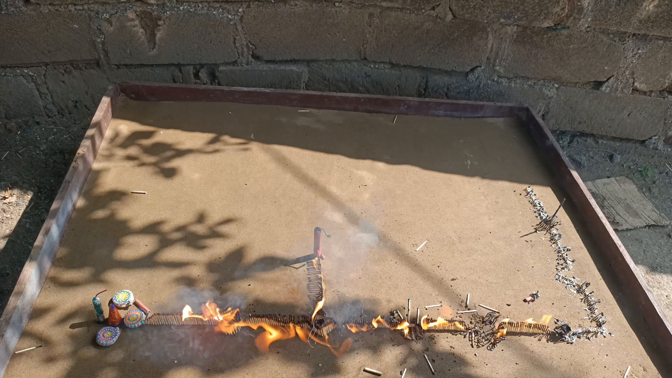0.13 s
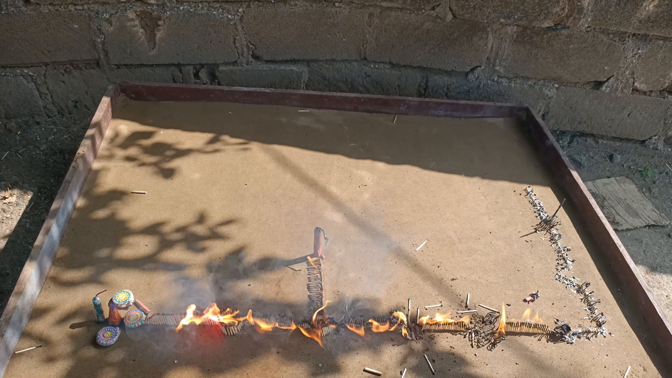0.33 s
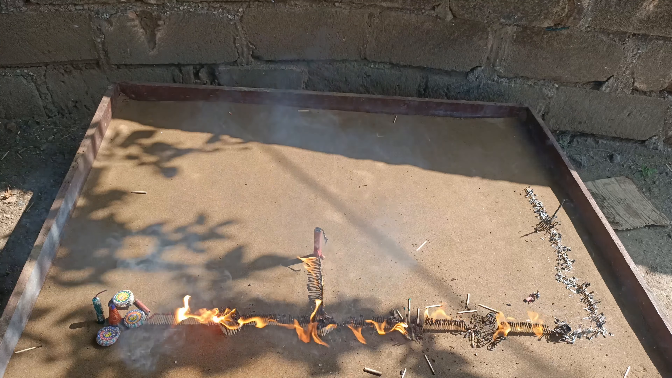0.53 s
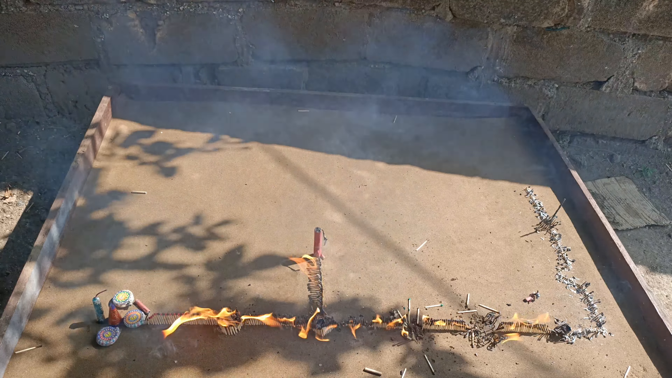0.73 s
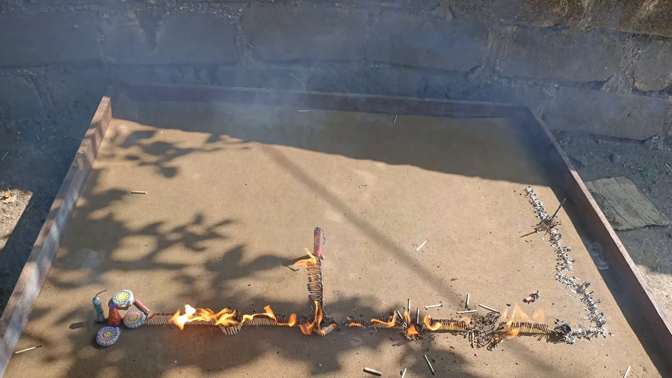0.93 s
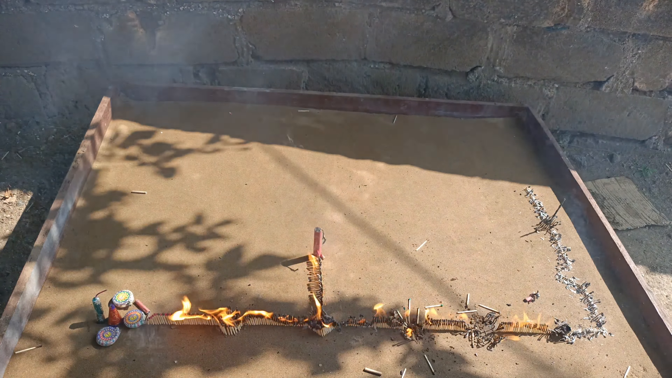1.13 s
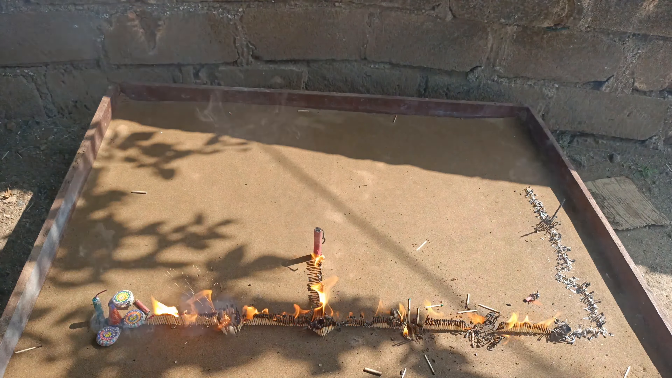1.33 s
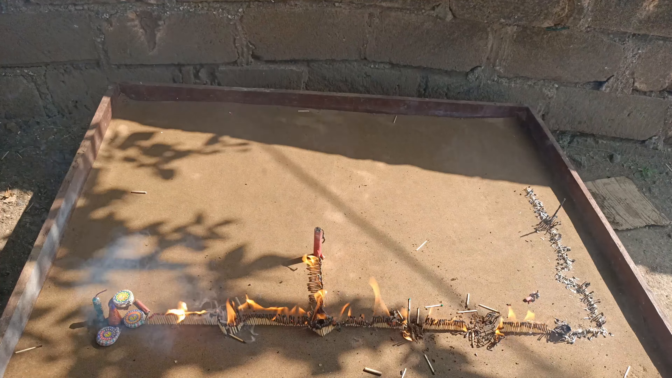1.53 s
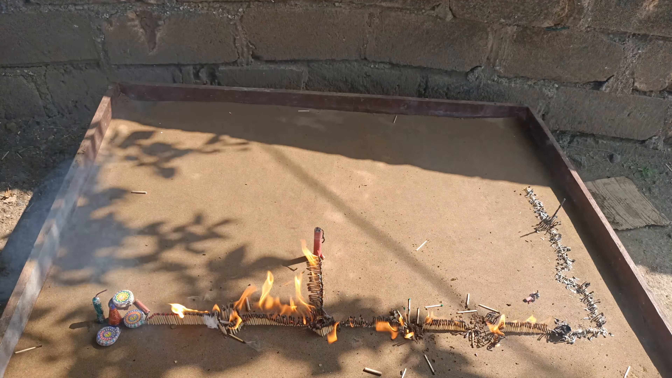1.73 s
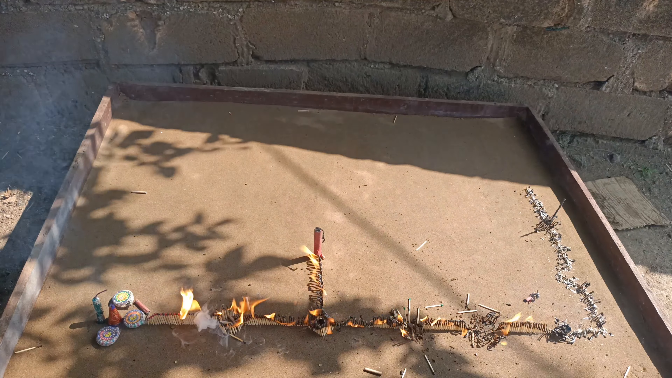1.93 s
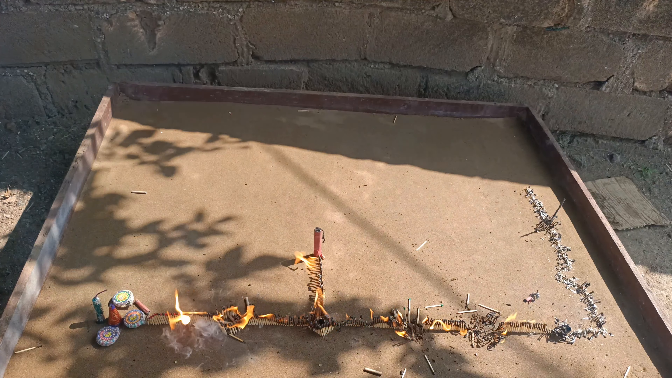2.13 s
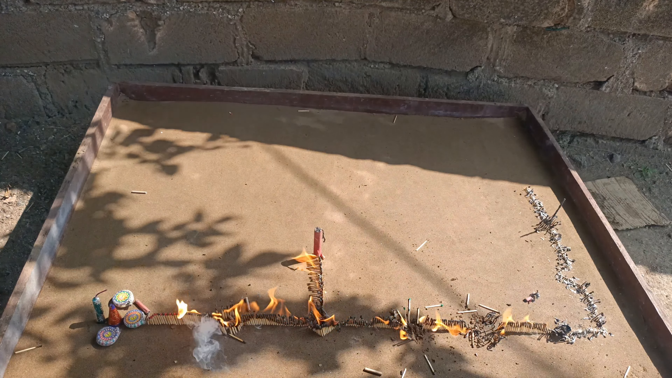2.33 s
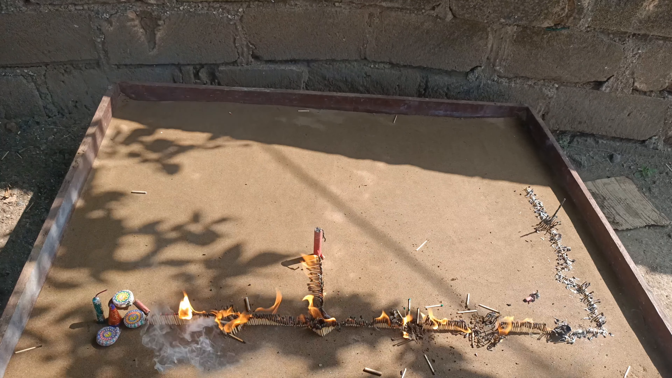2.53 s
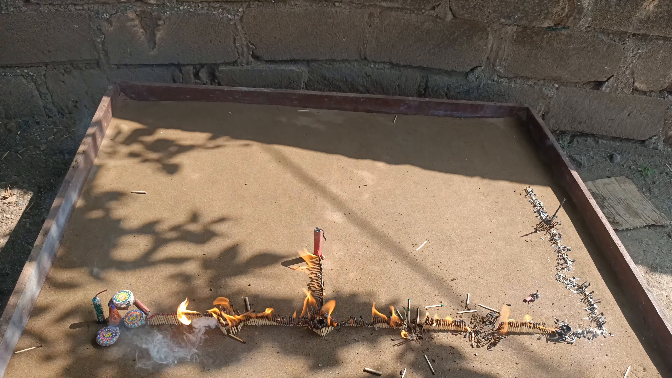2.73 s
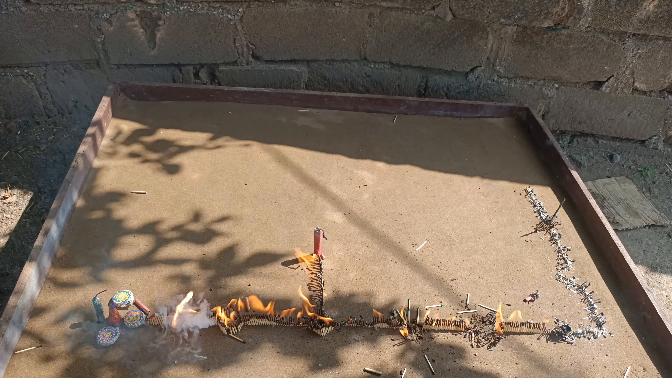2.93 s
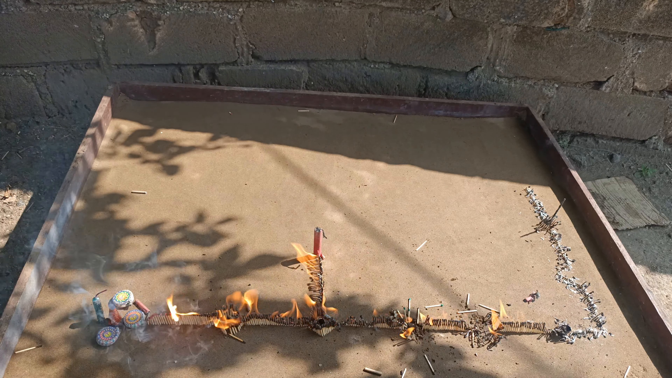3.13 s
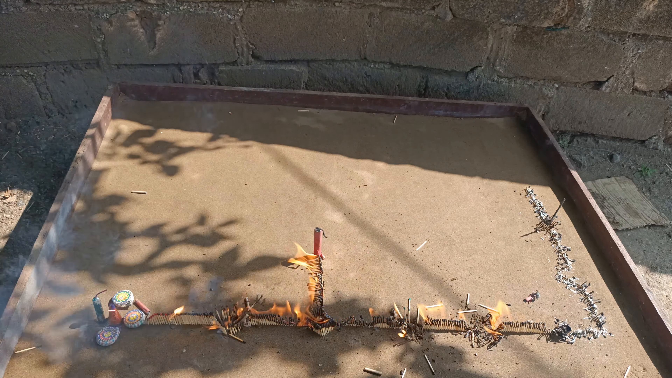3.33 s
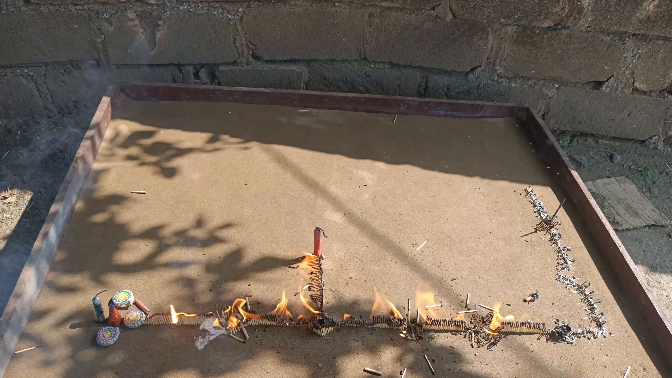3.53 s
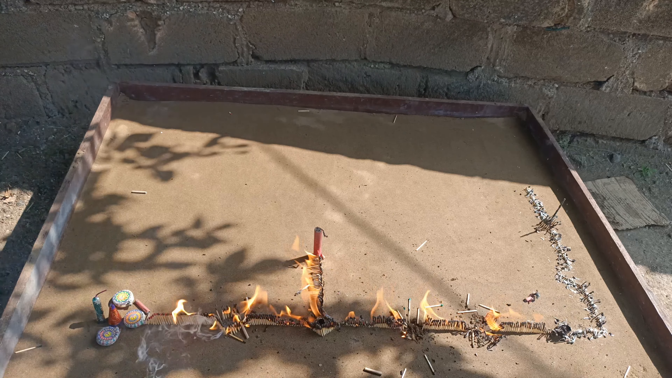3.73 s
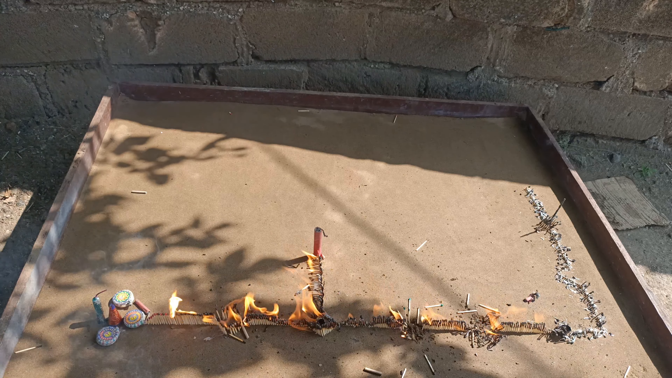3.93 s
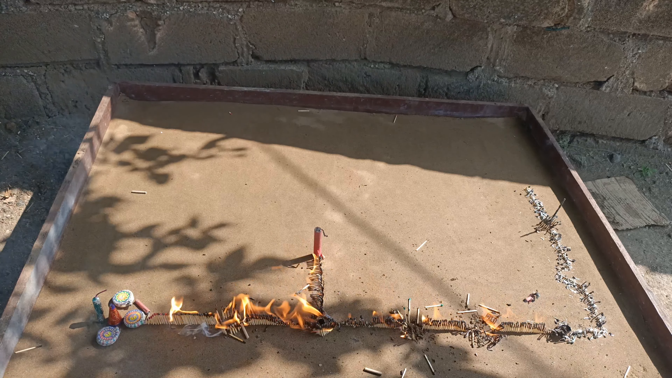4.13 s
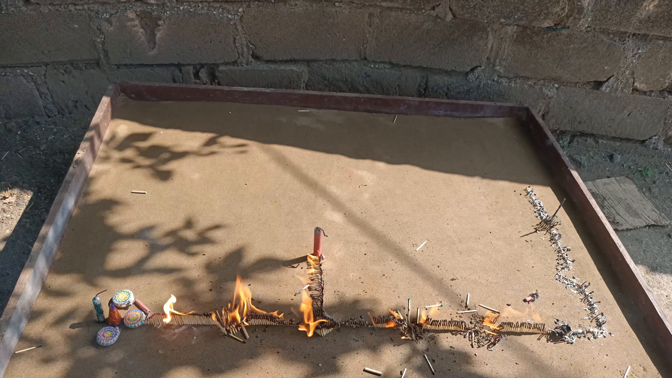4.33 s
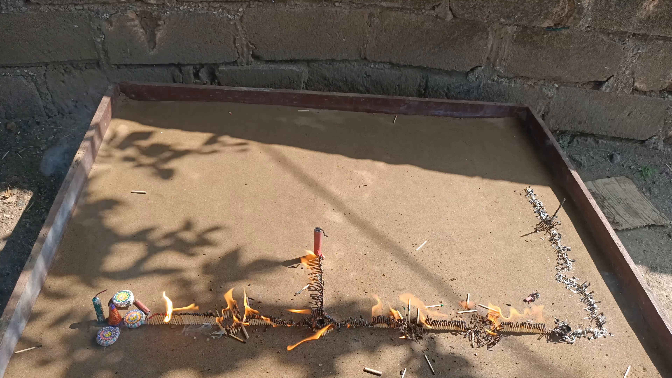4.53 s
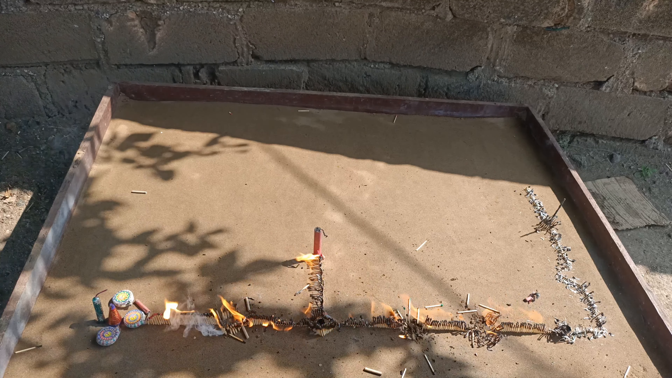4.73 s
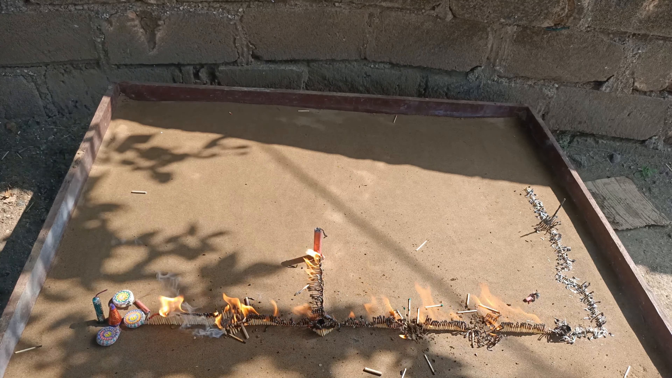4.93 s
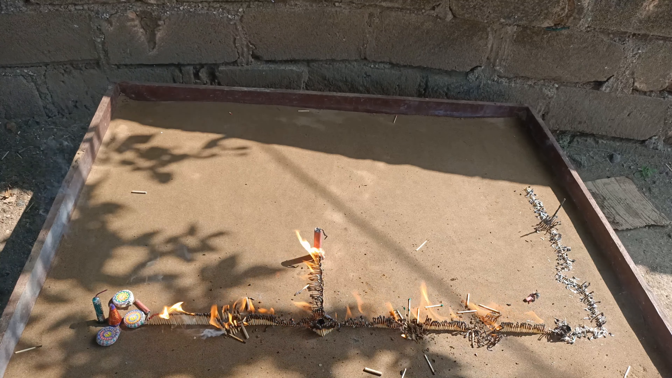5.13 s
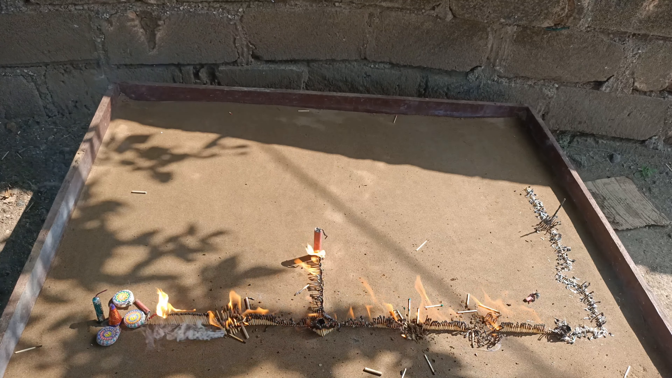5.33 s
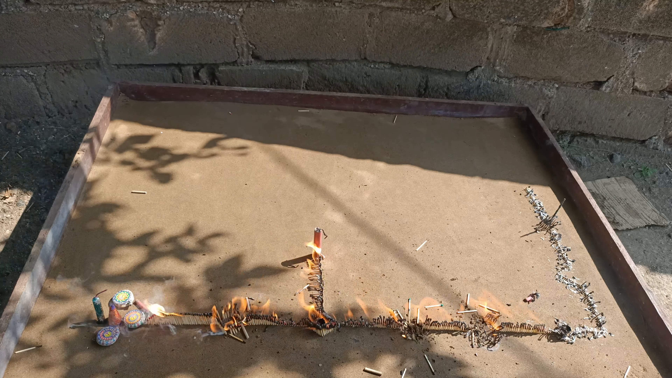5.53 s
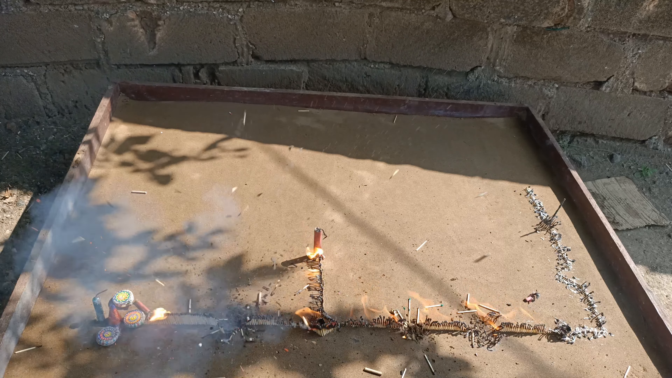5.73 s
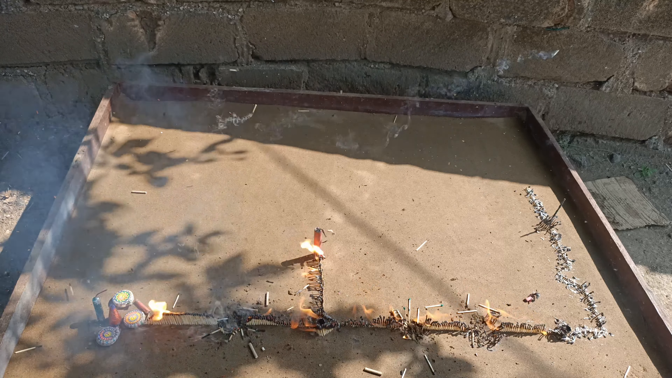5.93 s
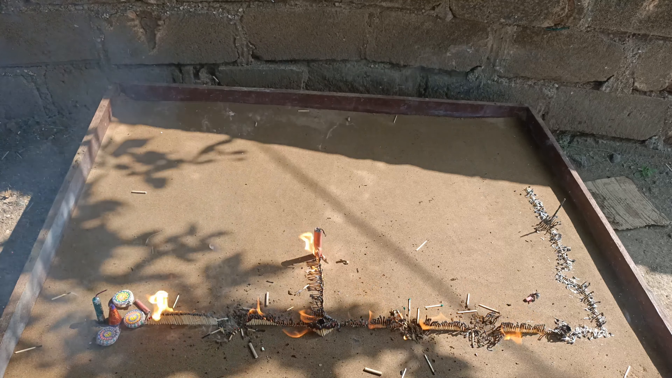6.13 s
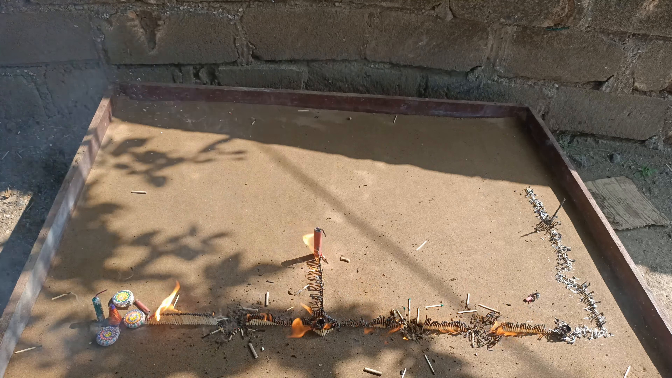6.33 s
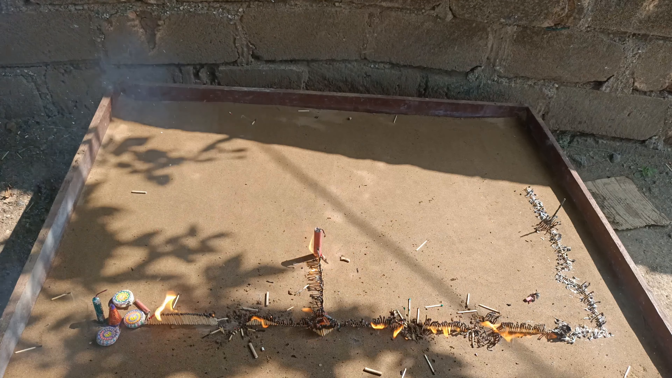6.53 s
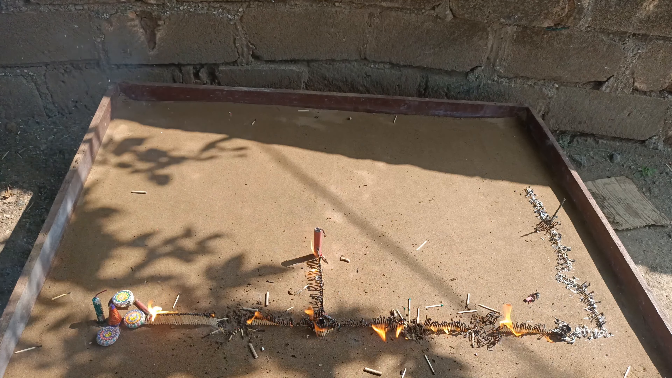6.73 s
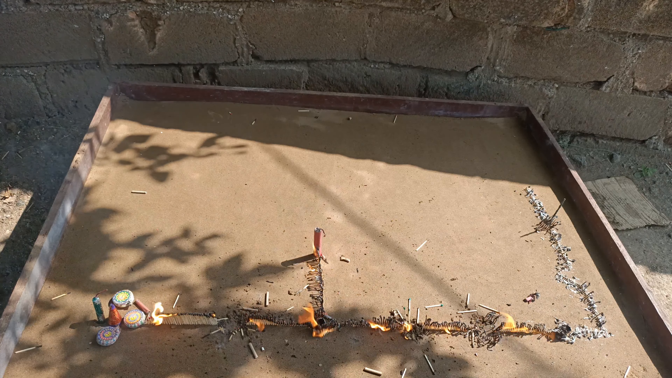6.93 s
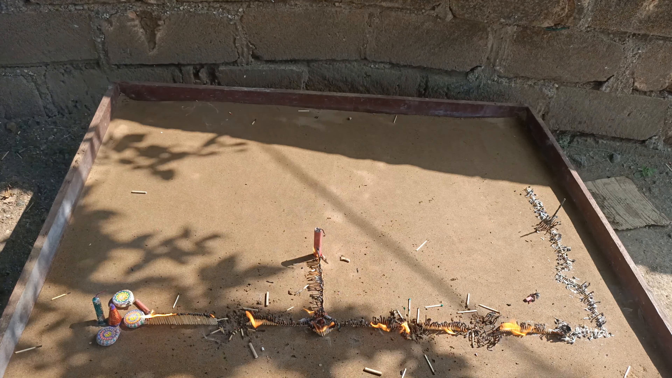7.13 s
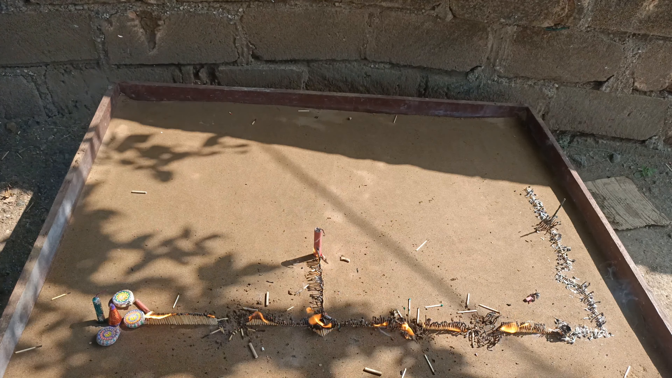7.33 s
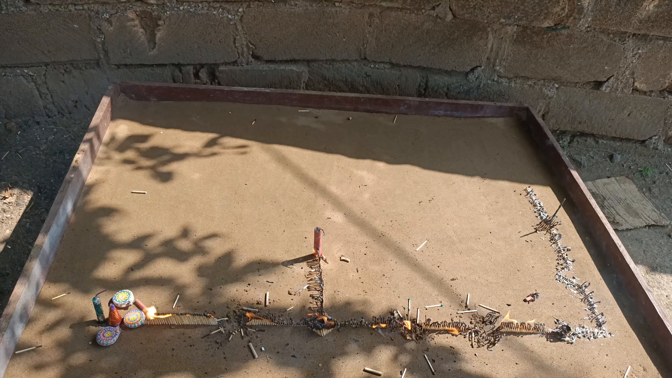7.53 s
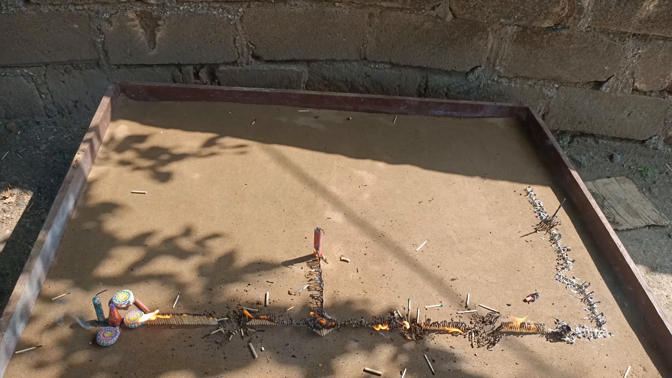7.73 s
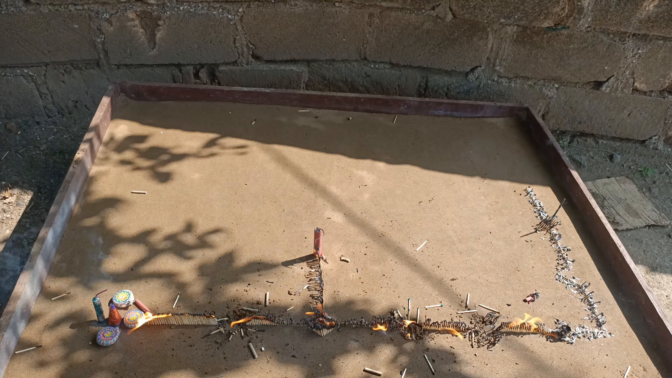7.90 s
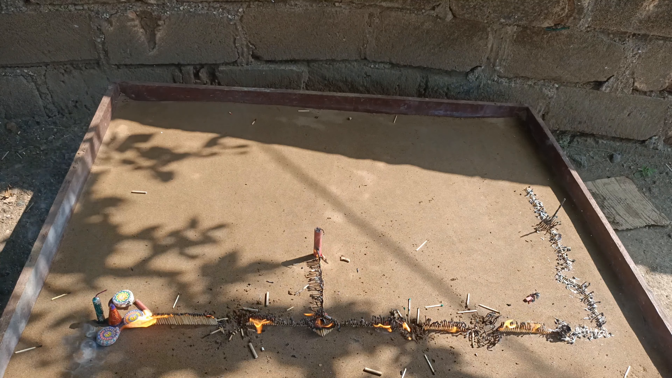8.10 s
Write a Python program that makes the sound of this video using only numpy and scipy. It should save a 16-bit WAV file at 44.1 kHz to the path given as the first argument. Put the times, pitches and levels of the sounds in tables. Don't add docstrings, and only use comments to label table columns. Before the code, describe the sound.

A match head flares with a sharp quiet hiss and a faint pop, while a cricket chirps over light wind. Three firecrackers then explode about two seconds apart, very close and overloading the stereo microphone: a bright crack, a boomier blast after a tiny whistle, and a loudest full bang. Walls return short dense echoes. Between bangs, flames softly roar and hiss and wind bumps the microphone.

```python
import sys
import numpy as np
from scipy import signal
from scipy.fft import rfft, irfft, next_fast_len
from scipy.io import wavfile
from scipy.ndimage import map_coordinates

SR = 44100
rng = np.random.default_rng(int(sys.argv[2]) if len(sys.argv) > 2 else 0)


def gain_from_db(level_db):
    decades = np.asarray(level_db, float) / 20
    return 10 ** decades


def bounce(signal):
    frames = np.transpose(np.atleast_2d(signal))
    limited = np.clip(frames, -1, 1)
    pcm = np.round(limited * 32767).astype(np.int16)
    wavfile.write(sys.argv[1], SR, pcm)


N = 360076


def unit(x):
    return x / np.sqrt(np.mean(x ** 2) + 1e-20)


def along(points, hz):
    f, v = np.transpose(points)
    return np.interp(np.log(hz + 1), np.log(f + 1), v)


def curves(rows, count=N):
    s, *cols = np.transpose(rows)
    return [np.interp(s[0] + np.arange(count) / SR, s, c) for c in cols]


def wobble(rate, count=N):
    knots = rng.standard_normal(int(count / 100) + 4)
    return map_coordinates(knots, [np.arange(count) * rate / SR])


def rush(gain, alike, count=N):
    m = next_fast_len(count + 4096)
    hz = np.fft.rfftfreq(m, 1 / SR)
    turn = np.arccos(np.clip(along(alike, hz), -1, 1)) / 2
    spectra = rfft(rng.standard_normal((2, m))) * gain(hz)
    mid, side = irfft(spectra * [np.cos(turn), np.sin(turn)], m)[:, :count]
    return unit(np.array([mid + side, mid - side]))


def shape(points, lo_hz=0, hi_hz=SR):
    def gain(f):
        edges = (1 + (lo_hz / (f + 1)) ** 8) * (1 + (f / hi_hz) ** 8)
        return gain_from_db(along(points, f)) / np.sqrt(edges)
    return gain


def add(out, s, x):
    part = out[:, round(s * SR):][:, :x.shape[-1]]
    part += x[..., :part.shape[1]]


def ring(hz, t60, t):
    return np.sin(2 * np.pi * hz * t) * gain_from_db(-60 * np.abs(t) / t60) * (t > 0)


def dying(t, hold, t60):
    knee_s = 0.012
    return gain_from_db(-60 * knee_s * np.logaddexp(0, (t - hold) / knee_s) / t60)


def swells(rows):
    t = np.arange(0, N / SR, .002)
    both = np.zeros((2, len(t)))
    for s, rise, fall, first_db, second_db in rows:
        bump = np.exp(-((t - s) / np.where(t < s, rise, fall)) ** 2)
        both += gain_from_db([[first_db], [second_db]]) * bump
    return np.array([np.interp(np.arange(N) / SR, t, v) for v in both])


# (frequency [Hz], left-right likeness [-1 to 1])
SURROUND_LIKENESS = [(60, 0.35), (150, 0.66), (380, 0.15), (950, 0.21), (2380, -0.12), (5980, 0.0028),
                     (15000, -0.34)]
# (time [s], level [dB])
BURN_LEVEL = [(0, -58), (.8, -63.5), (1.4, -61.5), (2.3, -63.5), (2.7, -61.5), (3.9, -64.5), (4.5, -65),
              (4.75, -62), (5, -58), (5.7, -59), (6.4, -64.5), (7, -67), (7.42, -68.5), (7.7, -65.5),
              (8.16, -64)]
# (time [s], rise [s], fall [s], hiss level [dB], roar level [dB])
HEADS_CATCHING = [(0, .01, 0.079, -50, -57), (.15, 0.044, 0.03, -55, -67), (.45, 0.32, 0.21, -68, -61),
                  (1.05, .03, 0.043, -60, -64), (2.1, .08, .1, -57.5, -66), (2.86, 0.023, 0.11, -68, -60.5),
                  (3.13, 0.032, 0.25, -81, -54.5), (3.3, 0.066, 0.3, -78, -56),
                  (3.8, 0.096, 0.18, -73, -65), (4.271, 0.061, 0.063, -60.5, -66.5),
                  (4.62, 0.12, 0.085, -54.5, -68), (4.81, .015, 0.095, -53, -66),
                  (5.15, .03, 0.045, -56.5, -80), (5.35, 0.23, 0.15, -56, -90),
                  (5.69, 0.031, 0.09, -77, -61), (6.32, .1, .1, -62, -68), (6.64, 0.042, 0.077, -62.5, -83),
                  (7.7, 0.16, .2, -66, -73)]
# (frequency [Hz], density [dB per Hz])
ROAR_COLOUR = [(65, -31.5), (110, -3.5), (153, -4), (309, -14), (449, -9.5), (786, -14.5), (1140, -14),
               (1910, -16), (3400, -20), (4420, -44.5), (7480, -120)]
HISS_COLOUR = [(1470, -37.5), (2500, -4.5), (3130, -5), (3900, 0), (4320, 0), (5360, 0.5), (8500, -22),
               (11000, -50), (18700, -120)]
FIZZ_COLOUR = [(4410, -27), (7500, -2.5), (10600, -6), (13000, -3.5), (15000, -1.5), (16000, -12)]


def flames():
    burn_db, = curves(BURN_LEVEL)
    swing_db = burn_db - burn_db.mean()
    hissing, roaring = swells(HEADS_CATCHING)

    hiss_db = 20 * np.log10(np.hypot(gain_from_db(burn_db), hissing))
    roar_db = 20 * np.log10(np.hypot(gain_from_db(-65 + 0.36 * swing_db), roaring))
    flare_rush = gain_from_db(-8.5) * (roaring + 0.98 * hissing)
    rush_db = 20 * np.log10(np.hypot(gain_from_db(-66 + .7 * swing_db), flare_rush))
    fizz_db = hiss_db - 10 - .3 * (hiss_db - burn_db.mean())

    flicker = 1.0 * wobble(9) + 0.92 * wobble(39)
    out = gain_from_db(roar_db + 5.5 + 1.1 * wobble(6.3)) * rush(shape(ROAR_COLOUR, 0, 1350), SURROUND_LIKENESS)
    out += gain_from_db(rush_db + 3.5 + flicker) * rush(shape(ROAR_COLOUR, 1500), SURROUND_LIKENESS)
    out += gain_from_db(burn_db + 3.0 + flicker) * rush(shape(HISS_COLOUR), SURROUND_LIKENESS)
    out += hissing * gain_from_db(2.5 + flicker) * rush(shape(HISS_COLOUR, 4000), SURROUND_LIKENESS)
    out += gain_from_db(fizz_db + 3.5 + flicker) * rush(shape(FIZZ_COLOUR), SURROUND_LIKENESS)
    return out


# (time [s], buffet level [dB])
BREEZE_LEVEL = [(0, -64), (1.2, -55), (2, -58.5), (3.3, -57), (4.5, -58), (5.5, -55), (6.5, -56),
                (7.4, -53.5), (8.16, -47.5)]
# (time [s], length [s], level [dB], left over right [dB])
EDDIES = [(0.94, 0.033, -52, 15), (1.246, 0.02, -41, 18), (1.315, 0.12, -42.5, 5),
          (2.994, 0.037, -51.5, -11), (3.298, .05, -54, -14), (4.8, 0.028, -52, -13), (4.99, 0.033, -57, 5),
          (5.184, 0.02, -42, 17), (5.26, .06, -55, -9), (5.416, 0.022, -51, 23), (5.493, 0.038, -45.5, -2),
          (6.327, .06, -53, -5), (6.632, 0.028, -50.5, 15), (6.77, 0.057, -53, 10),
          (7.009, 0.029, -51, -14.5), (7.164, 0.096, -49.5, 10.5), (7.496, .04, -55.5, -14),
          (7.6, 0.042, -55, 4), (7.735, 0.04, -45.5, 0), (7.82, .05, -54, 0), (7.93, 0.089, -43.5, -14)]
# (frequency [Hz], density [dB per Hz])
BUFFET_COLOUR = [(12, -32.5), (20, 0.5), (49, 1.5), (86, -6), (192, -23), (250, -38.5), (320, -68),
                 (550, -120)]


def wind():
    breeze_db, = curves(BREEZE_LEVEL)
    eddies = swells([(s, length, length, peak + pan / 2, peak - pan / 2) for s, length, peak, pan in EDDIES])
    lumps = gain_from_db(2.5 * np.array([wobble(22), wobble(22)]))
    strength = np.hypot(gain_from_db(breeze_db + 2 * wobble(16)), eddies)
    likeness = [(30, 0.092), (150, 0.55)]
    return gain_from_db(0.5) * strength * unit(lumps * rush(shape(BUFFET_COLOUR), likeness))


# (time [s], peak level [dB], length [s])
POPS = [
    (0.0094, -32, 0.0019),
    (0.146, -41, 0.0041),
    (1.479, -24.5, 0.0063),
    (1.55, -35.5, 0.0067),
    (1.5737, -35.5, 0.003),
    (1.6015, -38, 0.0045),
    (5.8053, -21.5, 0.0058),
    (6.4556, -51.5, 0.003),
]
# (frequency [Hz], density [dB per Hz])
POP_COLOUR = [(290, -31.5), (500, -1), (1090, -9), (2010, -9.5), (2390, -0.5), (5310, -8), (16000, -23.5)]


def slaps():
    out, t = np.zeros((2, N)), np.arange(SR // 10) / SR
    for s, db, length in POPS:
        puff = t / length * np.exp(1 - t / length)
        add(out, s, gain_from_db(db - 3.5) * puff * rush(shape(POP_COLOUR), SURROUND_LIKENESS, count=len(t)))
    return out


# (time [s], length [s], peak level [dB], pitch [Hz], stroke gap [s])
CHIRPS = [(0.237, 0.059, -47.5, 4700, 0.015), (.558, .115, -37.5, 4740, 0.02),
          (0.67, .045, -52.5, 5000, .014), (0.675, 0.18, -53.5, 4610, 0.032),
          (0.864, 0.12, -55, 4630, 0.026), (1.055, 0.11, -44, 4660, 0.017), (1.205, 0.06, -49, 4650, 0.022),
          (1.386, 0.027, -68, 4700, .02), (1.855, 0.024, -54.5, 4630, .02), (1.896, .04, -48, 4830, 0.018),
          (1.964, 0.063, -42.5, 4700, 0.018), (2.055, 0.035, -42, 4820, .02),
          (2.07, .075, -43, 4670, 0.011), (2.141, 0.076, -44.5, 4730, .013),
          (2.247, 0.026, -53.5, 4840, 0.014), (3.697, 0.035, -57, 4740, 0.018)]


def cricket():
    out, t = np.zeros((2, N)), np.arange(SR // 20) / SR
    start, length, peak_db, pitch, gap = np.transpose(CHIRPS)[:, :, None]
    shift, size, detune, *place = rng.standard_normal((len(CHIRPS), 8, 6)).transpose(2, 0, 1)

    at = np.arange(8) * gap
    arch = np.sin(np.pi * np.clip((at + gap / 2) / length, 0, 1))
    when = start + at + .002 * shift
    level_db = peak_db + 2 * size + 20 * .8 * np.log10(arch + 1e-4)
    stroke_hz = pitch + 80 * arch + 25 * detune
    rows = [when, level_db, stroke_hz, *place]

    for s, db, hz, pan, drift, lead in np.reshape(rows, (len(rows), -1)).T:
        port_phase = np.array([[0], [.9 + .5 * lead]])
        turns = 2 * np.pi * hz * (t + 0.28 * drift * t ** 2) + port_phase
        stroke = (t / 0.0074) ** 2 * np.exp(2 - 2 * t / 0.0062)
        tone = np.sin(turns) + gain_from_db(-24.5) * np.sin(2 * turns)
        level = gain_from_db(db + 3.5 + 2.7 * pan * np.array([[1], [-1]]))
        add(out, s - .003, level * stroke * tone)

    t = np.arange(SR // 5) / SR
    walls = rng.standard_normal((2, len(t))) * gain_from_db(-60 * t / 0.22)
    walls = walls / np.linalg.norm(walls[0])
    return out + gain_from_db(-7.5) * signal.fftconvolve(out, walls, axes=1)[:, :N]


BANG_TIMES = [
    1.4236,
    3.3822,
    5.7296,
]
RIGHT_DELAYS = [.00012, .00006, .00015]
# (time [s], peak level [dB], swing [Hz], t60 [s], polarity [+1 or -1])
SHOCK_FRONTS = [(1.42325, 6, 1400, .006, 1), (1.42400, 0, 220, .011, 1), (1.42780, -4, 1150, .008, 1),
                (1.42815, -4, 500, .006, -1), (1.42885, -2, 2300, .003, -1), (1.42910, -8, 150, .02, 1),
                (3.38150, -7, 400, .01, 1), (3.38285, 0, 380, .008, -1), (3.38405, 1, 140, .016, 1),
                (3.38680, -8, 400, .01, 1), (3.38785, 5, 480, .005, -1), (3.38000, -13, 5300, .04, 1),
                (3.38770, -11, 4500, .015, 1), (3.38290, -3, 4950, .010, 1), (5.72600, -30, 5200, .05, 1),
                (5.72950, 0, 1900, .003, 1), (5.72990, -1, 420, .008, -1)]


def fronts():
    out, t = np.zeros((2, N)), np.arange(4000) / SR
    for s, db, hz, t60, sign in SHOCK_FRONTS:
        lag = RIGHT_DELAYS[np.argmin(np.abs(np.subtract(BANG_TIMES, s)))]
        add(out, s, sign * gain_from_db(db) * ring(hz, t60, t - np.array([[0], [lag]])))
    return out


# (level [dB], hold [s], t60 [s], relative boom [dB], relative edge [dB])
NEAR_WALLS = [
    (-18, 0.065, 0.24, -6, -21),
    (-22, 0.037, 0.3, -1, -11),
    (-9.5, 0.027, 0.49, -8, -15),
]
# (relative level [dB], t60 [s], boom t60 [s], edge t60 [s])
FAR_WALLS = [
    (-15, 0.58, 0.36, 0.22),
    (-19, .5, 0.5, 0.19),
    (-25, 1.2, 0.59, .25),
]
# (frequency [Hz], density [dB per Hz])
BANG_COLOURS = [
    [(35, -40.5), (60, -20.5), (184, -12), (281, -7), (354, -13), (448, -6), (515, -18.5), (579, -5),
     (1170, -9), (4120, -9.5), (6430, -27), (13300, -37.5), (16000, -38.5)],
    [(35, -35), (60, -6), (113, -7), (281, -0.5), (380, -7.5), (448, -7), (1140, -23.5), (1340, -35),
     (1470, -26.5), (2200, -18.5), (3100, -23.5), (4320, -15.5), (8920, -37), (13300, -35.5), (16000, -46)],
    [(35, -27.5), (60, 3.5), (91, -18), (118, -3.5), (268, -1), (315, -5), (682, -5), (1140, -8.5),
     (1440, -10.5), (3580, -7), (7940, -23), (14600, -30), (16000, -37.5)],
]


def wash():
    out, count = np.zeros((2, N)), round(0.7 * SR)
    t = np.arange(count) / SR
    boom_hz, bright_hz, edge_hz = 524, 1500, 6500
    for s, near, distant, colour in zip(BANG_TIMES, NEAR_WALLS, FAR_WALLS, BANG_COLOURS):
        db, hold, t60, boom_db, edge_db = near
        far_db, far_t60, boom_t60, edge_t60 = distant

        def band(lo_hz, hi_hz):
            return rush(shape(colour, lo_hz, hi_hz), SURROUND_LIKENESS, count=count)

        far = gain_from_db(far_db) * dying(t, hold, far_t60)
        lumps = unit(gain_from_db(1.9 * wobble(160, count=count) + 0.25 * wobble(40, count=count)))
        ends = np.clip(t / .001, 0, 1) * np.clip((t[-1] - t) * 10, 0, 1)
        late = np.clip(t / 0.056, 0, 1)
        boom = np.hypot(dying(t, hold, boom_t60), gain_from_db(-4.5) * far)
        echo = late * gain_from_db(boom_db) * boom * band(67, boom_hz)
        body = np.sqrt(late) * dying(t, hold, .75 * boom_t60)
        echo += gain_from_db(boom_db - 2.5) * body * band(boom_hz, bright_hz)
        echo += lumps * dying(t, hold, t60) * band(bright_hz, edge_hz)
        echo += far * band(1300, 4507)

        crack = gain_from_db(6 - 60 * t / .025)
        edge = np.hypot(dying(t, 1.1 * hold, edge_t60), gain_from_db(-7) * far) + crack
        edge_gain = shape(colour, edge_hz)
        edge_noise = rush(lambda f: edge_gain(f) * f ** .6, SURROUND_LIKENESS, count=count)
        echo += lumps * gain_from_db(edge_db) * edge * edge_noise
        add(out, s, gain_from_db(db + 2.5) * ends * echo)
    return out


# (time [s], level [dB], swing [Hz], t60 [s])
INPUT_SAGS = [
    (1.427, -12.5, 11, 0.36),
    (3.388, -12, 24, 0.12),
    (5.735, -18.5, 14, .25),
    (5.767, -15, 48, .15),
]


def overload_sag():
    out, t = np.zeros((2, N)), np.arange(SR) / SR
    for s, db, hz, t60 in INPUT_SAGS:
        add(out, s, -gain_from_db(db) * gain_from_db([[-2], [2]]) * ring(hz, t60, t))
    return out


# (start [s], end [s], pitch [Hz], level [dB])
GAS_WHISTLE = (3.356, 3.381, 4980, -33)


def whistle():
    out = np.zeros((2, N))
    start, end, hz, db = GAS_WHISTLE
    t = np.arange(round((end - start) * SR)) / SR
    swell = np.clip(t / .022, 0, 1) ** 2
    add(out, start, gain_from_db(db + np.array([[0], [-9]])) * swell * np.sin(2 * np.pi * hz * t))
    return out


# (pitch [Hz], width [Hz], level [dB], t60 [s])
TRAY_MODE = (808, 16, -50, 3.5)


def tray():
    out, t = np.zeros((2, N)), np.arange(SR) / SR
    hz, width, db, t60 = TRAY_MODE
    hum = rush(lambda f: 1 / (1 + (2 * (f - hz) / width) ** 2), [(800, .5)], count=SR)
    add(out, BANG_TIMES[-1], gain_from_db(db - 60 * t / t60) * np.sqrt(1 - t) * hum)
    return out


def scene():
    burning = flames() + whistle()
    bangs = fronts() + wash() + slaps() + overload_sag() + tray()
    return burning + wind() + cricket() + bangs


def top_cut(x):
    return signal.sosfilt(signal.butter(12, 16740, fs=SR, output="sos"), x)


def record(dry):
    clipped = dry / (1 + np.abs(dry / .99) ** 6) ** (1 / 6)
    return top_cut(clipped)


dry = scene()
out = record(dry)
bounce(out)
```